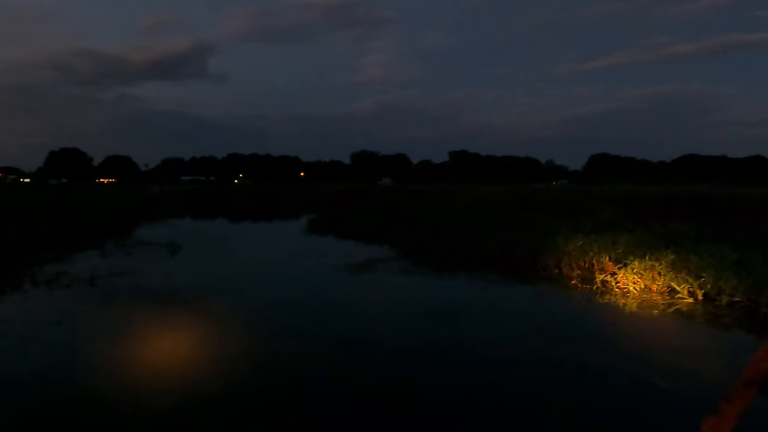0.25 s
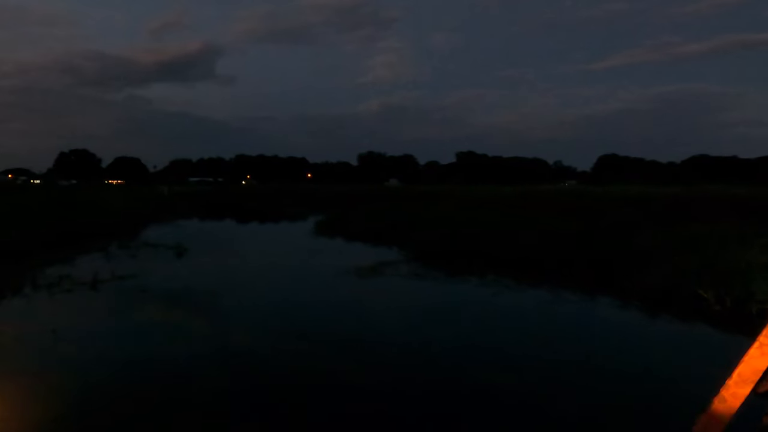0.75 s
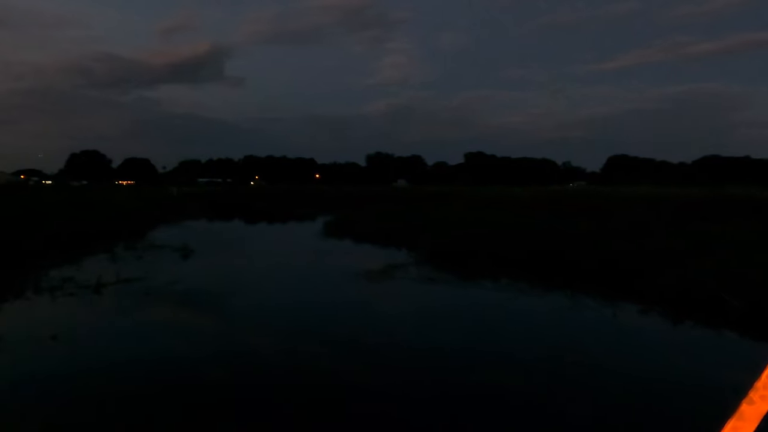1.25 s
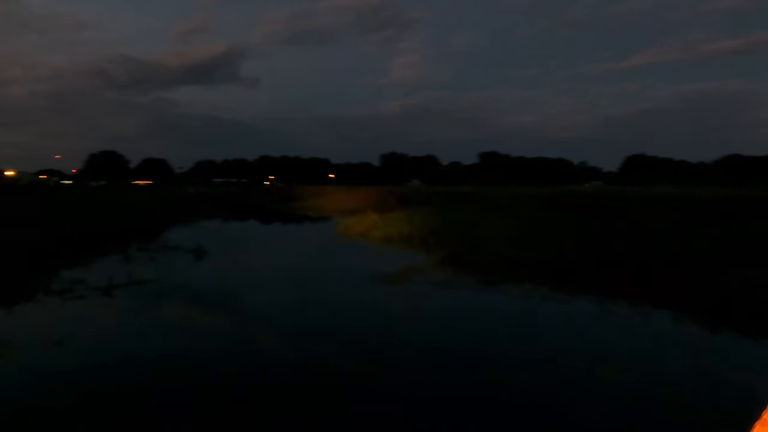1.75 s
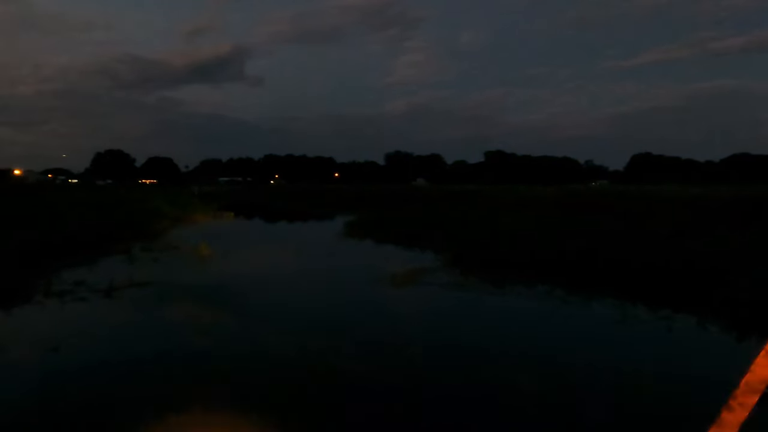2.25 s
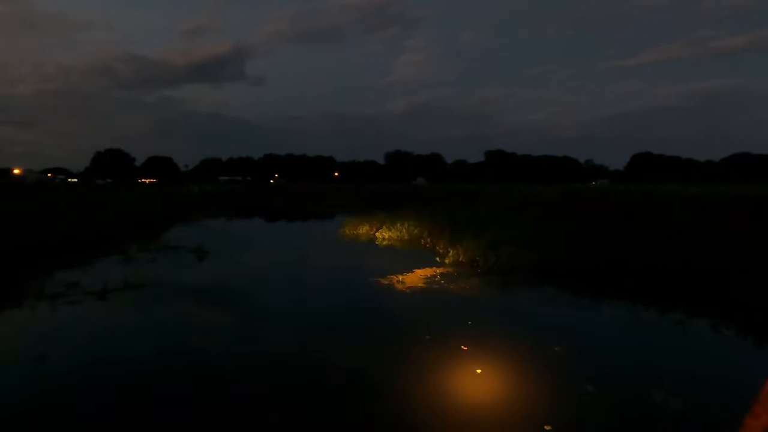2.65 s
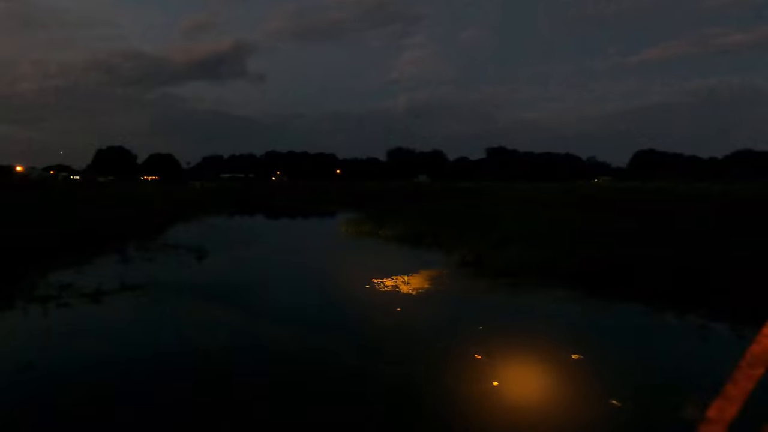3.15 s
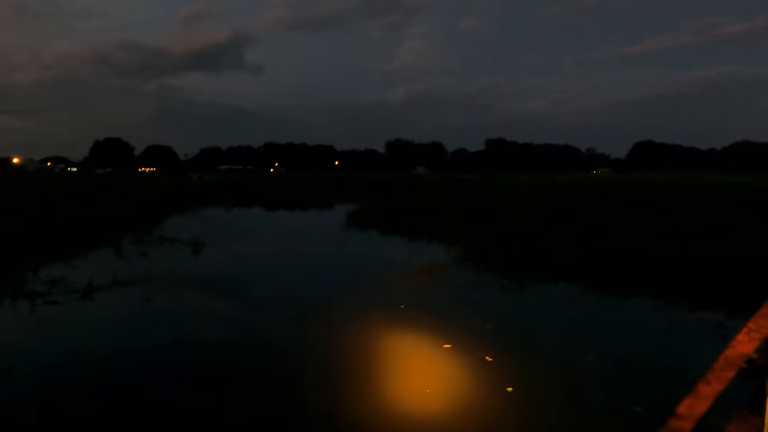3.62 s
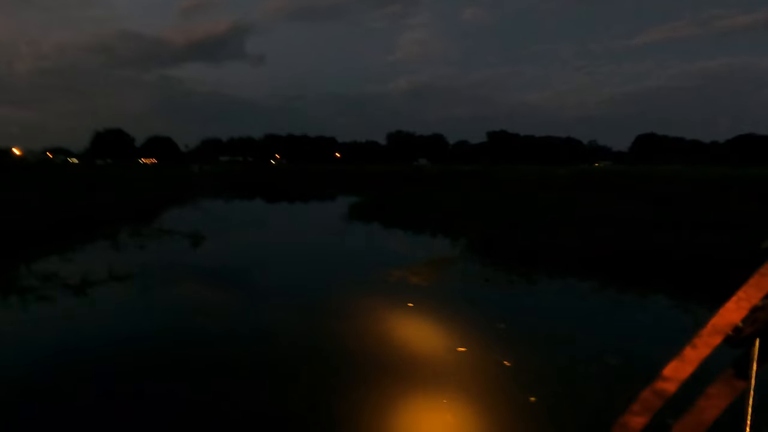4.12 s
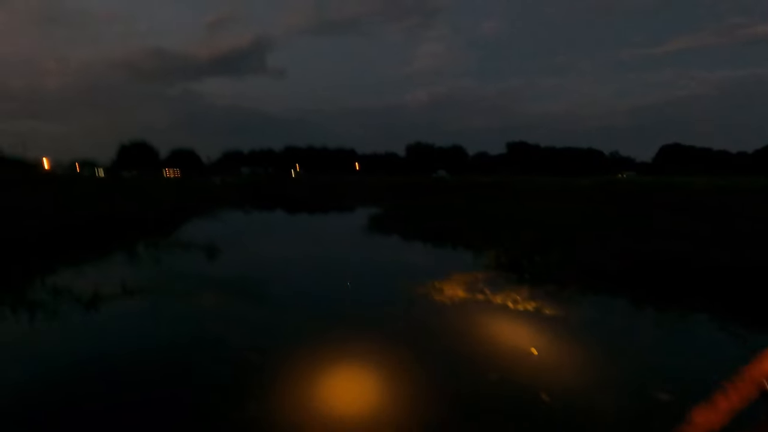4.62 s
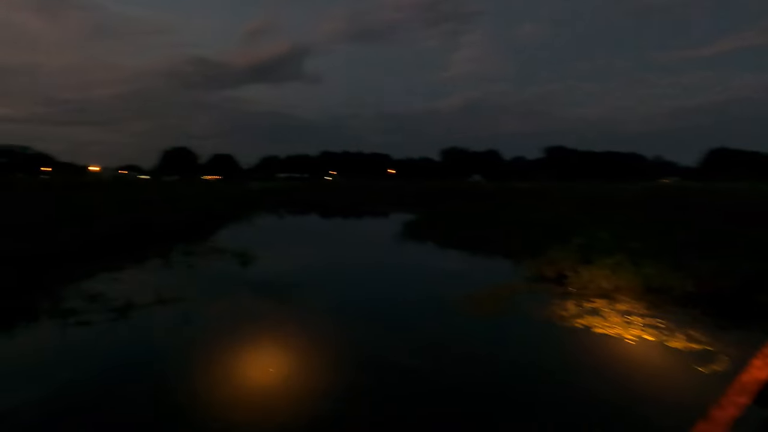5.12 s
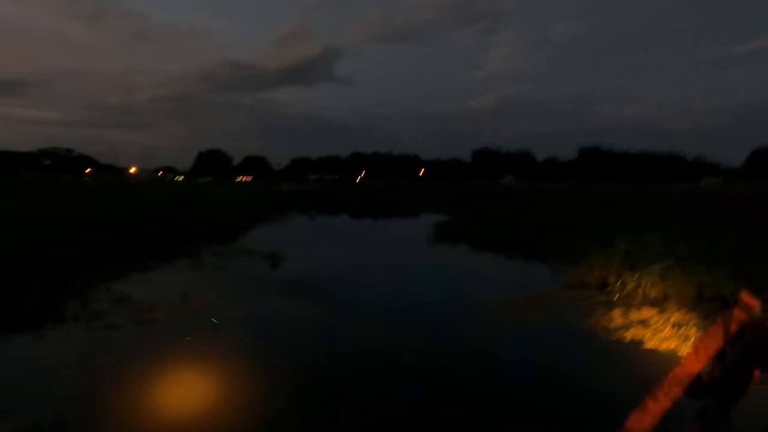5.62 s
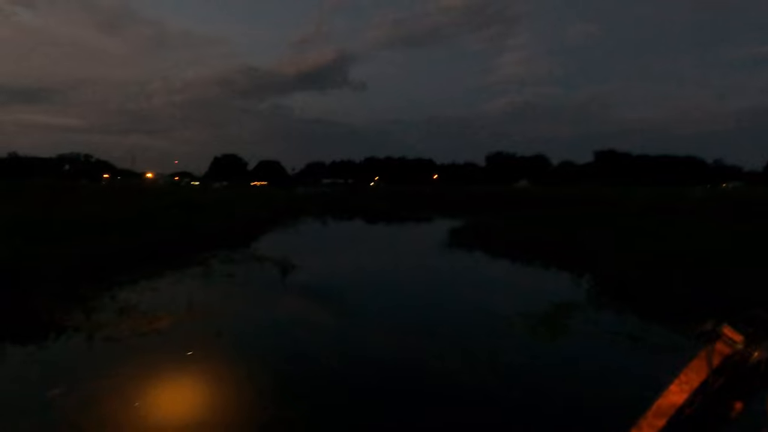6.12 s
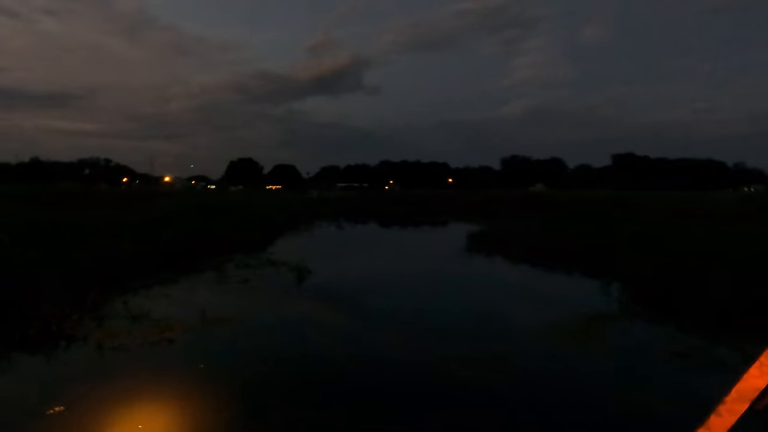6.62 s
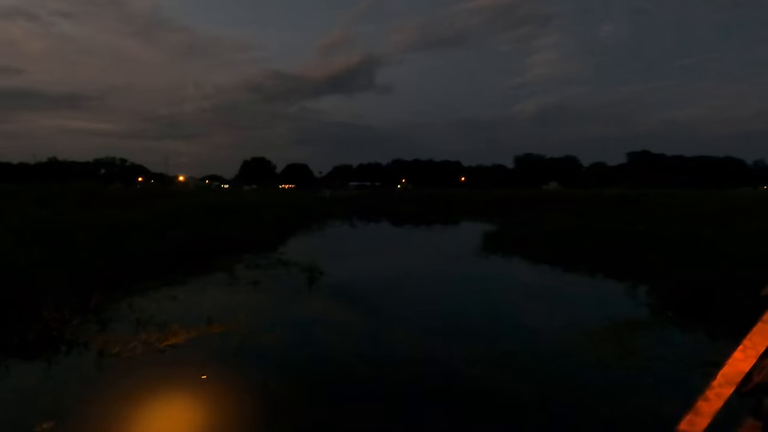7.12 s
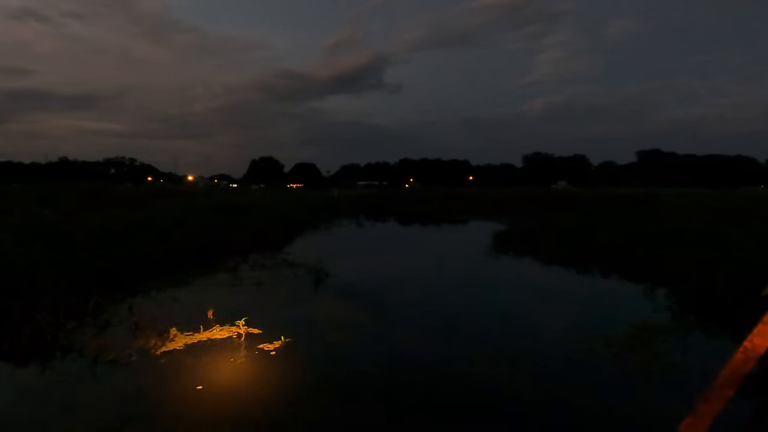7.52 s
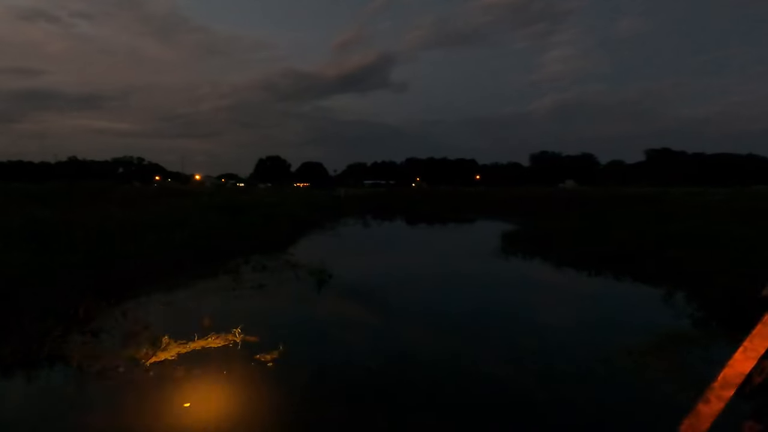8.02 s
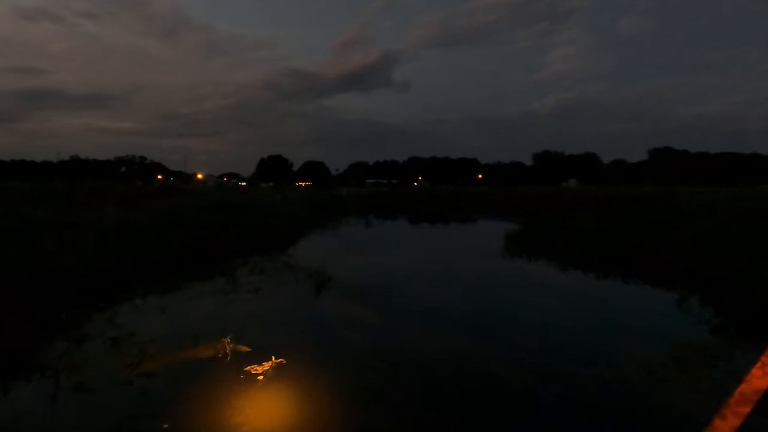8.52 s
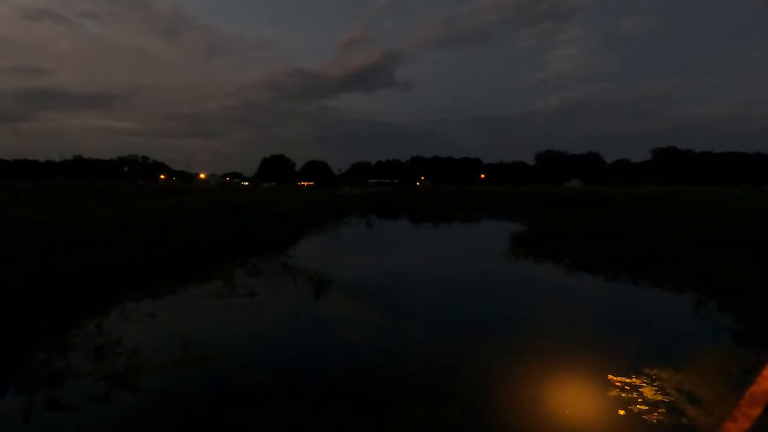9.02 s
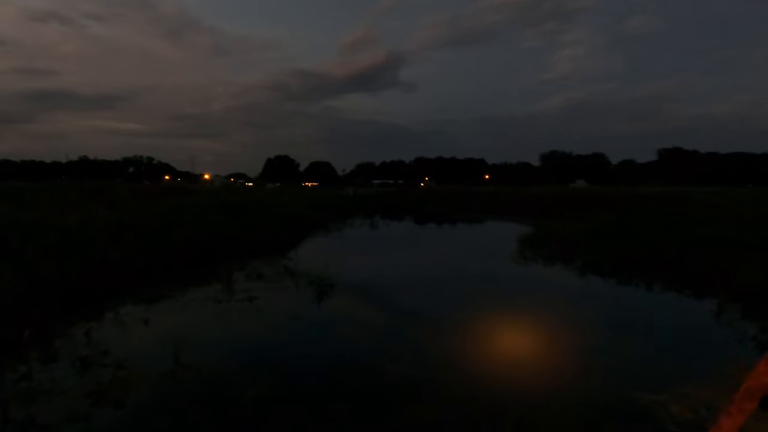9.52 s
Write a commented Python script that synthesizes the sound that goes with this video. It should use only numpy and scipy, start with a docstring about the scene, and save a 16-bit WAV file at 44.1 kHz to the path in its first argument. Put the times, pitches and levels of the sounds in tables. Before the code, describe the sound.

From on board, a low lumpy engine and propeller hum runs constantly while metal panels rattle and water hisses gently along the hull.

```python
"""An airboat's V8 turns its propeller at a fast idle, heard from on board as the boat gathers way.
The firings ring the exhaust pipes in an uneven throb, and tones locked to the crank make the drive whine.
Noise through resonances makes the hull and cage buzz in time with the engine, with odd booms and squeaks.
Shaped noise makes the propeller air and a soft wash that slowly brightens, with a few small splashes."""
import sys
import numpy as np
from scipy import signal
from scipy.fft import rfft, irfft, next_fast_len
from scipy.io import wavfile
from scipy.ndimage import uniform_filter1d

SR = 44100
rng = np.random.default_rng(int(sys.argv[2]) if len(sys.argv) > 2 else 0)


def file_out(sig):
    """Save sig as 16-bit WAV at sys.argv[1]."""
    # one column per channel
    cols = np.atleast_2d(sig).T
    # limit, then scale
    lim = np.clip(cols, -1, 1)
    pcm = np.round(lim * 32767).astype(np.int16)
    wavfile.write(sys.argv[1], SR, pcm)


N = 429975
T = np.arange(N) / SR  # time of each sample, s
HZ = np.fft.rfftfreq(next_fast_len(N), 1 / SR)  # frequencies of a full-length spectrum

# how fast the crank turns: (time [s], speed [rpm])
CRANK_SPEED = [(0.0, 661.1), (1.16, 660.0), (2.9, 650.0), (3.68, 630.7), (4.06, 646.9), (4.81, 655.7),
               (5.55, 653.5), (5.81, 643.4), (6.38, 640.1), (6.95, 656.8), (7.8, 648.8), (8.05, 659.0),
               (8.58, 645.2), (9.53, 653.5), (9.75, 656.0)]
# one row a cylinder, in firing order: (strength [dB], lateness [ms])
CYLINDERS = [(-.89, -.45), (-.65, .01), (.66, .7), (-.83, -.41), (1.16, .15), (1.25, .73), (-1.39, -.54),
             (1.73, .36)]
# which side of the engine each cylinder is on, in firing order: (side [-1 or 1])
CYLINDER_SIDES = [-1, 1, -1, -1, 1, -1, 1, 1]
# resonances of both exhaust pipes together: (frequency [Hz], width [Hz], level [dB])
PIPES_TOGETHER = [(40.5, 33.1, -20.5), (104.7, 23.4, -19), (85.92, 21, -24.5)]
# resonances of one pipe against the other: (frequency [Hz], width [Hz], level [dB])
PIPES_AGAINST = [(61.2, 9, -39.1), (120.1, 8.4, -30.2)]
# tones of the drive: (multiple of crank speed, level [dB], unsteady share [0-1], gain under load [dB])
WHINE_TONES = [(6.48, -40, 0.03, -1), (12.5, -47, 0.3, 1.5), (13.38, -45.5, .2, -1.5),
               (15.93, -50, 0.3, -1.5), (49.63, -56, .2, -3.5), (54.75, -58, 0.5, 3),
               (58.6, -61.5, 0.5, 3.5), (96.3, -67, 0.25, -3.5), (104.4, -67, 0.6, 1.5),
               (119.9, -71, 0.9, 0), (124.4, -67.5, 0.5, 0.5), (130.7, -70.5, 0.1, -0.5),
               (170.2, -70.5, 0.4, 0.5), (203.5, -76.5, .4, 0.5)]
# ringing of hull and cage: (frequency [Hz], width [Hz], level [dB])
PANEL_RINGS = [(293.5, 63, -49), (592.8, 48, -55), (816, 170, -58.5), (1058, 91, -62.5), (1353, 140, -65),
               (1790, 390, -68.5), (2240, 230, -77.5)]
# the deck shudders: (time [s], level [dB], length [s])
SHUDDERS = [(0.58, -44.5, 0.1), (0.85, -51.5, 0.043), (1.09, -37, 0.05), (1.55, -48, 0.097),
            (2.2, -47.5, 0.11), (5.27, -47, 0.046), (7.0, -48, 0.042), (7.94, -37.5, 0.076),
            (8.12, -39.5, 0.084), (8.35, -33.5, 0.049), (8.67, -43.5, 0.063)]
# the hull booms: (time [s], level [dB], length [s])
BOOMS = [(3.41, -46, 0.06), (3.66, -48.5, .1), (3.89, -45.5, .07), (5.78, -52, .06), (6.02, -51, .05),
         (6.2, -43.5, .05), (6.47, -49.5, .06), (7.65, -48, .06), (8.6, -50, .07), (8.77, -46.5, .06)]
# tones of the loose cage: (multiple of crank speed, level [dB], unsteady share [0-1])
CAGE_TONES = [(104.2, -66.5, .25), (124.8, -67, .2), (192.5, -72, .3), (204.5, -69.5, .12), (246, -74, .3)]
# spectrum of the propeller air: (frequency [Hz], relative level [dB per Hz])
AIR_SPECTRUM = [(15, -18.5), (30, -6), (65, 1.5), (125, 0.5), (155, -11.5), (230, -9), (340, -14),
                (450, -16.5), (680, -21), (950, -30.5), (1500, -35), (2600, -41), (3700, -43.5),
                (6000, -70.5)]
# spectrum of the water along the hull: (frequency [Hz], relative level [dB per Hz])
WASH_SPECTRUM = [(400, -11), (900, 4.5), (1080, 3), (1220, -5), (1380, 2.5), (1520, -0.5), (2500, -0.5),
                 (3500, -8), (4500, -10), (6000, -15.5), (8000, -25.5), (11000, -39.5), (14000, -43)]
# spectrum of the spray: (frequency [Hz], relative level [dB per Hz])
SPRAY_SPECTRUM = [(3500, -22.5), (5500, -10.5), (6400, -5), (7000, 0.5), (7700, -9.5), (9000, -13),
                  (10800, -21), (12200, -16.5), (14000, -23.5)]
# splashes at the bow: (time [s], level [dB], length [s])
SPLASHES = [(0.04, -58, 0.096), (0.206, -56.5, 0.058), (7.91, -53, 0.075), (8.128, -53.5, .07),
            (8.35, -55, 0.06), (8.65, -54, .07)]
# spectrum of a splash: (frequency [Hz], relative level [dB per Hz])
SPLASH_SPECTRUM = [(700, -12.5), (1400, 10.5), (2200, 4), (3200, 0), (4500, -15), (8000, -23.5),
                   (13000, -31.5)]
# larger drops that land on the boat: (time [s], level [dB])
LARGE_DROPS = [(2.273, -72), (4.405, -66), (5.743, -60.5), (5.87, -63)]
# a fitting squeaks: (time [s], level [dB], length [s], pitch [Hz])
SQUEAKS = [(5.542, -60, .032, 2470), (5.55, -64.5, .025, 2790), (6.05, -63, .024, 2430)]
# how alike left and right noise are: (frequency [Hz], likeness [0-1])
LIKENESS = [(150, 1), (300, 1), (700, 0.95), (1400, 0.89), (2800, 0.62), (5000, 0.69), (7500, 0.82),
            (12000, 0.2)]
# how much louder the left side is: (frequency [Hz], left over right [dB])
LEFT_LOUDER = [(100, .2), (350, .5), (700, 1.5), (1400, 1.7), (2800, 4.6), (5500, .8), (8000, 1),
               (12000, 6)]
# how far the left side leads: (frequency [Hz], lead [radians])
LEFT_LEAD = [(40, -0.056), (130, 0.033), (300, -0.064), (600, -0.17), (1000, -0.21), (1400, -0.7),
             (2500, 0.047), (4300, -0.046)]

FIRST_FIRING = .096  # share of an engine cycle
UNEVEN_DB, JITTER_MS = .55, .22  # chance in the strength and timing of each firing
# the idle hunts; the heavy propeller follows only a little
HUNT_CYCLES, HUNT_PER_S, DRIVE_SHARE = .0016, 3.5, .25
LOAD_RPM, LOAD_SPAN_RPM = 647.3, 5.5  # below this speed the drive runs slack, above it pulls
PICKUP_S, PICKUP_LENGTH_S = 2.3, 5.1  # when the boat begins to gather way, and how long that takes
EDGE_HZ = 14200  # upper band limit


def gain_of(db):
    """Decibels to amplitude."""
    return 10 ** (np.asarray(db) / 20)


def evened(x):
    """Scales to rms 1."""
    return x / np.sqrt(np.mean(abs(x) ** 2) + 1e-20)


def curve(rows, column):
    """One column of a table, joined by straight lines in time."""
    rows = np.asarray(rows)
    return np.interp(T, rows[:, 0], rows[:, column])


def read(points):
    """A table over frequency, joined on a log axis."""
    f, value = np.transpose(points)
    return np.interp(np.log(HZ + 1), np.log(f + 1), value)


def resonance(f, hz, width):
    """Response of a steep band-pass, 1 at its centre."""
    return (1j * f * width / (hz ** 2 - f ** 2 + 1j * f * width)) ** 2


def wander(rate):
    """Slow chance of rms 1, changing about rate times a second."""
    steps = rng.standard_normal(4096)
    f = np.fft.rfftfreq(len(steps), T[-1] / len(steps))
    slow = irfft(rfft(steps) / np.sqrt(1 + (f / rate) ** 4))
    return evened(np.interp(T, np.linspace(0, T[-1], len(slow)), slow))


def noise(shape):
    """Stereo noise with this spectrum, most alike on both sides in the bass; rms 1 in the middle."""
    a, b, c, d = rng.standard_normal((4, len(HZ)))
    same = np.clip(read(LIKENESS), 0, 1)
    mid_spectrum = (a + 1j * b) * np.sqrt(1 + same)
    side_spectrum = (c + 1j * d) * np.sqrt(1 - same)
    mid, side = irfft(np.array([mid_spectrum, side_spectrum]) * shape)[:, :N]
    return np.array([mid + side, mid - side]) / mid.std()


def surges(rows):
    """Level of a row of soft swells, each (time [s], level [dB], length [s])."""
    return sum(gain_of(db) * np.exp(-2 * ((T - s) / length) ** 2) for s, db, length in rows)


def load():
    """How hard the drive pulls: -1 slack to 1 taut."""
    return np.tanh((curve(CRANK_SPEED, column=1) - LOAD_RPM) / LOAD_SPAN_RPM)


def pace():
    """The boat's way through the water: 0 drifting to 1 cruising."""
    return np.clip((T - PICKUP_S) / PICKUP_LENGTH_S, 0, 1)


def swell(hz, bass_hz=450, split_hz=950, low_db=-2.0, high_db=3.5):
    """As the boat gathers way, the high ringing grows and the middle eases; the bass stays."""
    db = 0 if hz < bass_hz else low_db if hz < split_hz else high_db
    return gain_of(db * (pace() - .5))


def tone(cycles, multiple, unsteady, flutter=11.0, ripple=0.0047):
    """A tone locked to the crank. Each firing twists the shaft, adding sidebands; play makes it flutter."""
    unsteady = np.clip(unsteady, 0, 1)
    twist = ripple * multiple * np.sin(2 * np.pi * len(CYLINDERS) * cycles)
    angle = 2 * np.pi * (2 * multiple * cycles + rng.random()) + twist  # two crank turns a cycle
    loose = wander(flutter) * np.cos(angle) + wander(flutter) * np.sin(angle)
    return np.sqrt(2 * (1 - unsteady)) * np.cos(angle) + np.sqrt(unsteady) * loose


def shake(cycles, firing_db, rock_db, lag):
    """Level, of rms 1, of a part jolted by each firing and rocked once a crank turn; lag is in cycles."""
    jolt = np.cos(2 * np.pi * len(CYLINDERS) * (cycles - lag))
    rock = np.cos(4 * np.pi * (cycles - lag))
    return evened(gain_of(firing_db * jolt + rock_db * rock))


def exhaust(cycles, load_db=-0.1):
    """Eight firings a cycle, each a little different, ring the pipes; uneven left-right order makes the lope."""
    count = len(CYLINDERS)
    firing = np.arange(-2 * count, int(cycles[-1] * count) + 1)  # starts early so the pipes already ring
    cylinder = firing % count
    strength_db, late_ms = np.array(CYLINDERS)[cylinder].T
    chance = rng.standard_normal((len(firing), 2))

    # when each firing falls, following the changing speed
    due = firing / count + FIRST_FIRING
    mean_rate = cycles[-1] / T[-1]  # cycles a second
    s = due / mean_rate + np.interp(due, cycles, T - cycles / mean_rate)
    s = s + (late_ms + JITTER_MS * chance[:, 0]) / 1000

    # each firing is a sharp puff: a delay in the spectrum places it between samples
    size = next_fast_len(N + SR, real=True)
    f = np.fft.rfftfreq(size, 1 / SR)[:4000]  # only the low end is needed
    puffs = np.exp(-2j * np.pi * np.outer(f, s)) * gain_of(strength_db + UNEVEN_DB * chance[:, 1])
    # the resonances in the table alternate in sign
    together = sum(-(-1) ** k * gain_of(db) * resonance(f, hz, width)
                   for k, (hz, width, db) in enumerate(PIPES_TOGETHER))
    against = sum(gain_of(db) * resonance(f, hz, width) for hz, width, db in PIPES_AGAINST)
    sides = np.array(CYLINDER_SIDES)[cylinder]
    spectrum = together * puffs.sum(1) + against * (puffs @ sides)
    throb = irfft(spectrum, size)[:N] * SR / (count * mean_rate)
    return gain_of(load_db * load()) * throb


def gears(cycles, hum_db=-43.0, hum_load_db=4.0, hum_pace_db=-1.3,
          ring_db=-59.5, ring_load_db=4.0, ring_pace_db=-2.0):
    """Under load the drive holds a fairly steady hum, and a higher ring that pulses with the firings."""
    hum = tone(cycles, multiple=25, unsteady=.11, flutter=11)
    ring = tone(cycles, multiple=79.2, unsteady=.28)
    ring = ring * shake(cycles, firing_db=3.5, rock_db=1.5, lag=.056)
    hum_level = gain_of(hum_db + hum_load_db * load() + hum_pace_db * pace())
    ring_level = gain_of(ring_db + ring_load_db * load() + ring_pace_db * (pace() - .5))
    return hum * hum_level + ring * ring_level


def whine(cycles):
    """More tones of the drive, strongest in the bass; some swell when it pulls, others when it runs slack."""
    crank_hz = 2 * cycles[-1] / T[-1]
    pull = load()
    return sum(gain_of(db + load_db * pull) * swell(multiple * crank_hz) * tone(cycles, multiple, unsteady)
               for multiple, db, unsteady, load_db in WHINE_TONES)


def panels(cycles, load_db=-1.1):
    """Hull and cage panels ring in time with the engine, a little more when the drive is slack."""
    ring = sum(gain_of(db) * swell(hz) * noise(resonance(HZ, hz, width)) for hz, width, db in PANEL_RINGS)
    return ring * shake(cycles, firing_db=-2.0, rock_db=0.5, lag=0.055) * gain_of(load_db * load())


def deck(cycles, level_db=-46.5, load_db=2.0, pace_db=-1.5, shudder_db=-8.0, thud_db=-3.5):
    """The deck drone pulses each crank turn, stronger under load; at times it shudders with a broader rumble."""
    shudder = surges(SHUDDERS)
    drone = tone(cycles, multiple=34.8, unsteady=.5, flutter=14)
    drone *= gain_of(level_db + load_db * load() + pace_db * pace()) + gain_of(shudder_db) * shudder
    rumble = noise(resonance(HZ, hz=316, width=190)) * gain_of(thud_db) * shudder
    return (drone + rumble) * shake(cycles, firing_db=-1.0, rock_db=3.5, lag=0.02)


def hull(cycles, level_db=-56.5, load_db=-1.0):
    """The hull hums a little more when the engine sags, and swells into short growling booms."""
    hum = noise(resonance(HZ, hz=528, width=45)) * gain_of(level_db + load_db * load())
    boom = tone(cycles, multiple=49.6, unsteady=.22, flutter=18) * surges(BOOMS)
    return (hum + boom) * shake(cycles, firing_db=4.0, rock_db=-2.3, lag=0.047)


def cage(cycles, buzz_db=-72.5, tight_db=-68.0, sing_db=-66.0, pace_db=4.0, load_db=1.0,
         loose_s=6.48, loosen_s=0.15):
    """The cage buzzes more at pace and under load; later it shakes loose and sings, a burst to each firing."""
    strain = gain_of(pace_db * pace() + load_db * load())
    loose = np.clip((T - loose_s) / loosen_s, 0, 1)
    buzz = gain_of(buzz_db) * strain * noise(resonance(HZ, hz=1658, width=170))
    sing = tone(cycles, multiple=155, unsteady=.12, flutter=12)
    sing = sing * shake(cycles, firing_db=6.0, rock_db=2.5, lag=.04)
    sing_level = gain_of(tight_db) * strain + gain_of(sing_db) * loose
    others = sum(gain_of(db) * tone(cycles, multiple, unsteady, flutter=12)
                 for multiple, db, unsteady in CAGE_TONES)
    jolts = shake(cycles, firing_db=4.0, rock_db=2.0, lag=.04)
    return sing * sing_level + (buzz + others * loose) * jolts


def propeller(cycles, air_db=-36.5, gust_db=0.4, pace_db=-0.3):
    """Churned air: dull noise, gently pulsing, easing slightly as the boat gathers way."""
    level_db = air_db + gust_db * wander(8.8) + pace_db * (pace() - .5)
    pulse = shake(cycles, firing_db=2.0, rock_db=0.5, lag=0.082)
    return noise(gain_of(read(AIR_SPECTRUM))) * gain_of(level_db) * pulse


def wash(level_db=-62.0, pace_db=4.5, load_db=0.5, lap_db=0.9):
    """Water slides along the hull as noise, louder with pace and a little with each push of the drive."""
    level = gain_of(level_db + pace_db * pace() + load_db * load() + lap_db * wander(9.5))
    return noise(gain_of(read(WASH_SPECTRUM))) * level


def droplets(per_s=70, spread_db=0.5, level_db=-10.5):
    """Single drops tick at random in the spray, a few larger than the rest."""
    drop_gain = gain_of(spread_db * np.minimum(rng.exponential(1, (2, N)), 4))
    drops = (rng.random((2, N)) < per_s / SR) * drop_gain
    both_sides = drops + .7 * drops[::-1]  # each side also hears the other's drops
    size = 2 * (len(HZ) - 1)
    patter = irfft(rfft(both_sides, size) * gain_of(read(SPRAY_SPECTRUM)))[:, :N]
    return evened(patter) * gain_of(level_db)  # level against the fizz


def spray(level_db=-79.0, pace_db=7.5, fizz_db=0.5, gust_db=0.5):
    """Fine flickering spray and its drops grow quickly with pace."""
    fizz = noise(gain_of(read(SPRAY_SPECTRUM))) * gain_of(fizz_db * wander(70))
    return (fizz + droplets()) * gain_of(level_db + pace_db * pace() + gust_db * wander(6))


def splashes(grain_db=2.0):
    """Short swishes of noise at the bow, made grainy by a fast unsteady level."""
    return noise(gain_of(read(SPLASH_SPECTRUM))) * surges(SPLASHES) * gain_of(grain_db * wander(120))


def ticks(hz=4500, width=4200, decay_s=.014):
    """Each large drop lands with a short bright tick of fading noise."""
    hits = sum(gain_of(db) * (T >= s) * np.exp(-abs(T - s) / decay_s) for s, db in LARGE_DROPS)
    return noise(resonance(HZ, hz, width)) * hits


def squeaks(waver_hz=15, waver_per_s=90):
    """A dry fitting rubs and sings briefly, its pitch unsteady."""
    total = 0
    for s, db, length, hz in SQUEAKS:
        pitch = hz + waver_hz * wander(waver_per_s)
        sing = np.sqrt(2) * np.sin(2 * np.pi * np.cumsum(pitch) / SR)
        total = total + sing * surges([(s, db, length)])
    return total


def scene():
    """One engine cycle takes two crank turns and drives every moving part."""
    steady = np.cumsum(curve(CRANK_SPEED, column=1)) / (120 * SR)  # rpm to cycles so far
    hunt = HUNT_CYCLES * wander(HUNT_PER_S)
    cycles = steady + DRIVE_SHARE * hunt
    drive = exhaust(steady + hunt) + gears(cycles) + whine(cycles)
    rattles = panels(cycles) + deck(cycles) + hull(cycles) + cage(cycles)
    air_and_water = propeller(cycles) + wash() + spray() + splashes()
    return drive + rattles + air_and_water + ticks() + squeaks()


def levelled(x, aim_db=-15.0, window_s=0.045, hold=0.52):
    """Gain control draws the smoothed power part of the way (hold) toward one level."""
    size = max(int(window_s * SR), 1)
    power = uniform_filter1d(uniform_filter1d((x ** 2).mean(0), size), size)
    short_db = aim_db - 10 * np.log10(abs(power) + 1e-12)
    return x * gain_of(np.clip(hold, 0, 1) * short_db)


def record(dry, ceiling=0.46):
    """Gain control; two microphone ports that differ in colour and phase; rounded peaks; then the band limit."""
    left_over_right = gain_of(read(LEFT_LOUDER)) * np.exp(1j * read(LEFT_LEAD))
    colour = left_over_right ** np.array([[.5], [-.5]])  # half to each side
    faded = levelled(dry) * signal.windows.tukey(N, .001)  # tiny fades at both ends
    heard = irfft(rfft(faded, 2 * (len(HZ) - 1)) * colour)[:, :N]
    heard = heard / (1 + (heard / ceiling) ** 8) ** (1 / 8)
    low_pass = signal.firwin(511, EDGE_HZ, window=("kaiser", 9), fs=SR)
    return signal.oaconvolve(heard, low_pass[None], "same")


dry = scene()
out = record(dry)
file_out(out)
```